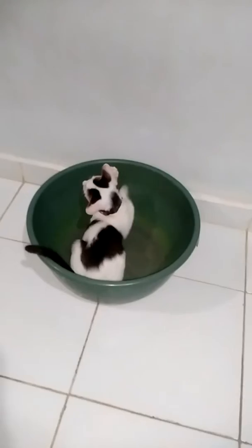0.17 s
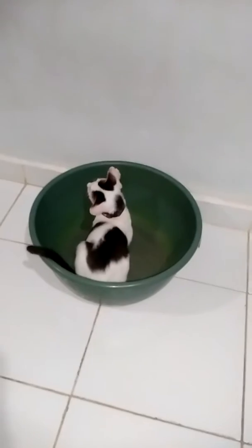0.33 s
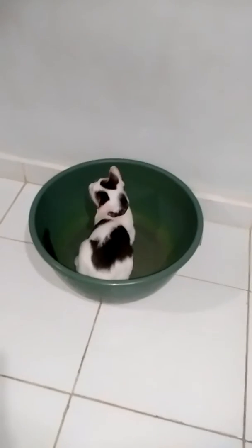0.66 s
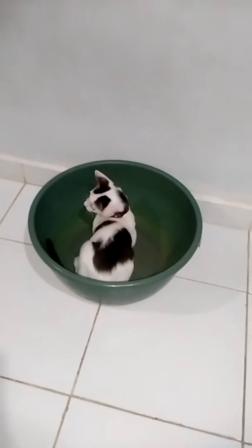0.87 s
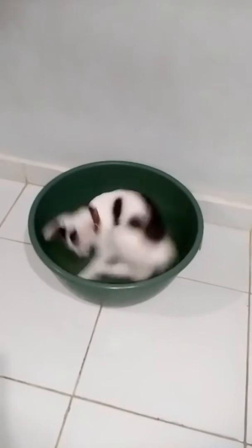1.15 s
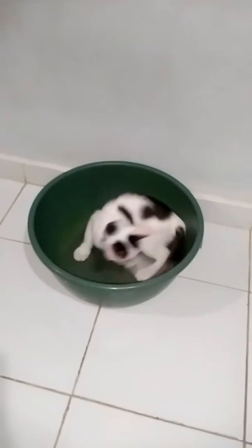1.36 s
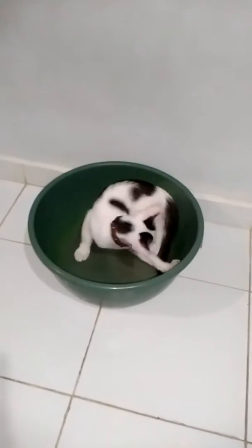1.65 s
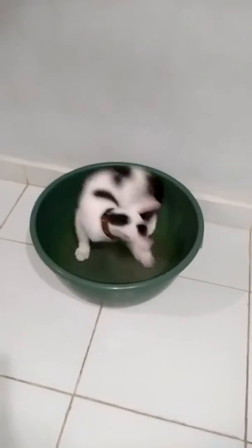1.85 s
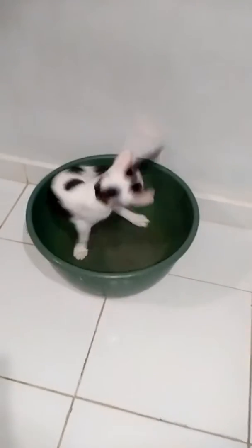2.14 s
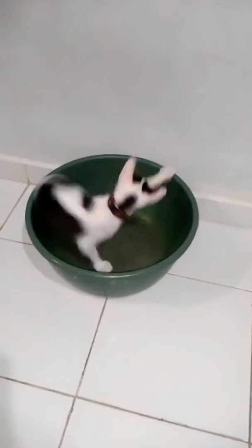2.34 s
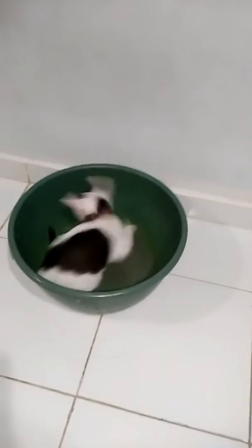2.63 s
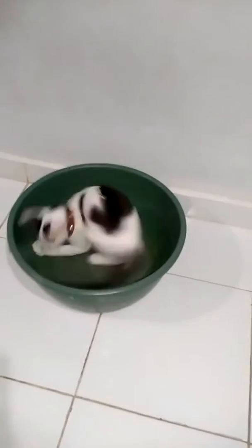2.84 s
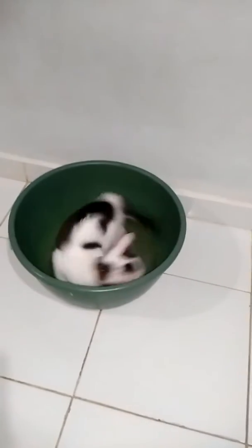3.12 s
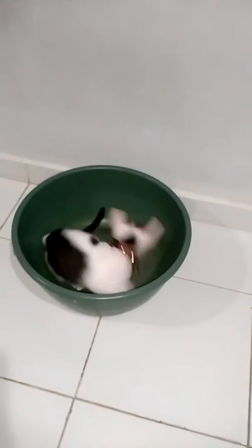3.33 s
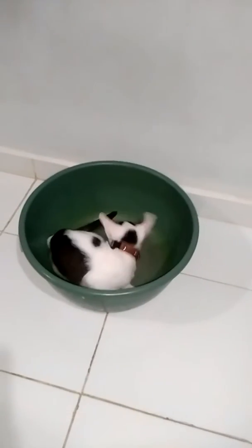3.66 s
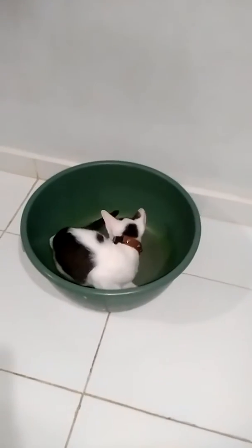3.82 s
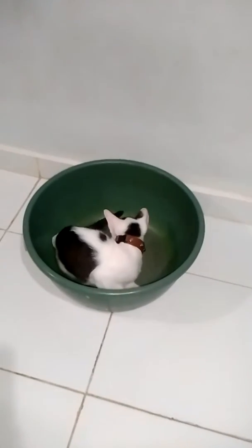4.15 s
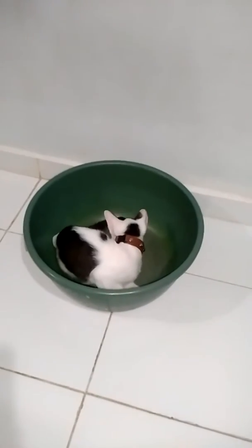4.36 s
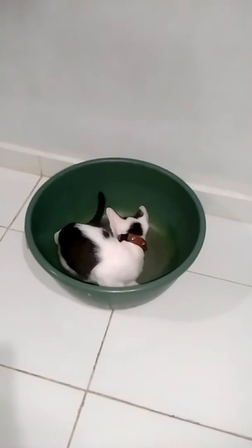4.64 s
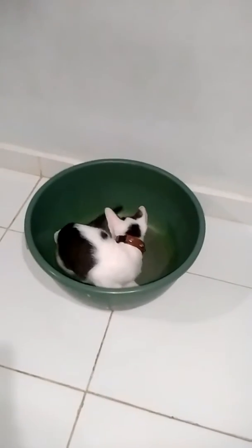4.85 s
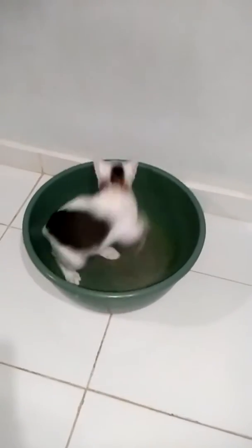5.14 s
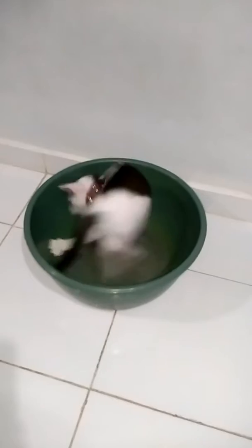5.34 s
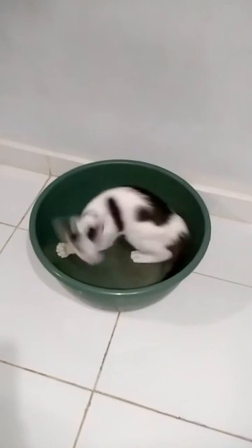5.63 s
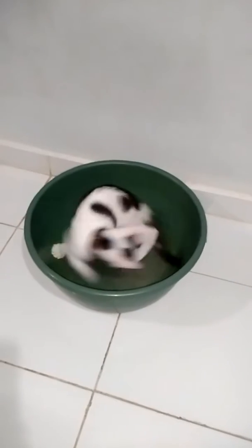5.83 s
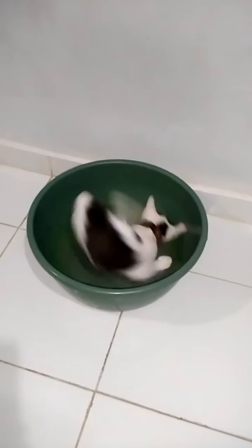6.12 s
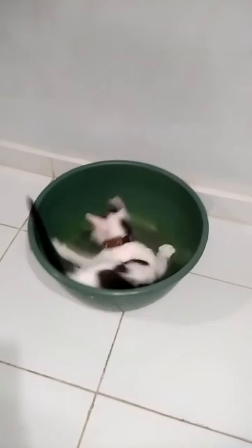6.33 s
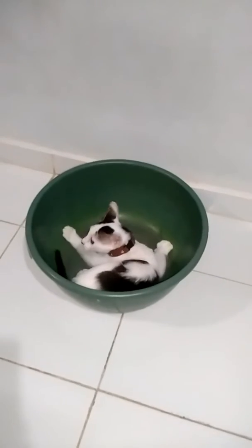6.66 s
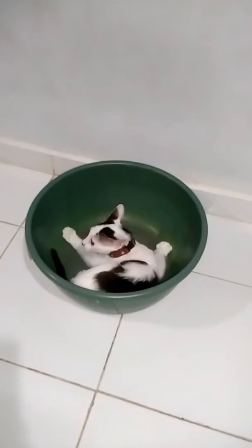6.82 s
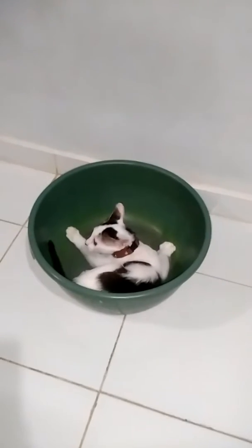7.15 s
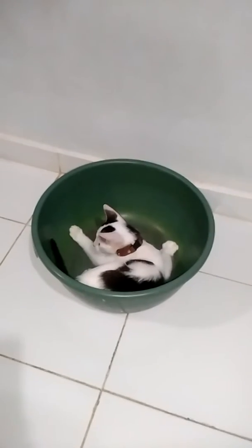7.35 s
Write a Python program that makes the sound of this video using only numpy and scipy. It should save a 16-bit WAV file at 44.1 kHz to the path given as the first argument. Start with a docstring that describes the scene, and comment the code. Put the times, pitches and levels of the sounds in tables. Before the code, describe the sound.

Close, slightly thin sound in a hard, lively little room. Soft fur and pads rub plastic, then claws scrape in jerky swipes with falling squeaky edges, while paws knock the hollow shell. A tiny bell tinkles now and then. Beneath it a steady low electric hum switches on and later cuts off. Play pauses midway, bursts out again, then settles into quiet house air.

```python
"""A kitten plays in a plastic basin on a tiled floor: fur and pads first rub it in filtered stick-slip noise.
Claws soon scrape it in jerky strokes; from about 1.1 to 4.7 s a motor hums in harmonics and whirrs in shaped noise.
From 1.3 s landings thump the shell as noise and decaying modes, and claw tips tick in short noise bursts.
A collar bell jingles from 1.6 s as a pellet excites its modes; the motor's works coast on faintly to the end.
The hard little room answers the kitten's sounds with decaying noise, over quiet house air."""
import sys
import numpy as np
from scipy import signal
from scipy.fft import rfft, irfft, next_fast_len
from scipy.io import wavfile
from scipy.ndimage import map_coordinates

SR = 44100
rng = np.random.default_rng(int(sys.argv[2]) if len(sys.argv) > 2 else 0)


def master(y):
    """Save y as 16-bit WAV."""
    cut = np.clip(np.atleast_2d(y).T, -1, 1)
    pcm = np.round(cut * 32767)  # scale
    wavfile.write(sys.argv[1], SR, pcm.astype(np.int16))


N = 330029

# Quiet air of the house. Each row: frequency in Hz, relative level in dB per Hz.
AIR_SPECTRUM = [(15, -56), (25, 1), (102, 4.5), (123, -5.5), (141, -3.5), (330, -10), (442, -11.5),
                (772, -17.5), (1580, -21), (1810, -20.5), (3520, -26.5), (6480, -29.5), (14400, -33)]
# Reverberation of the tiled room. Each row: frequency in Hz, time to fall 60 dB in seconds.
ROOM_DECAY = [(150, 0.38), (400, 0.33), (1000, 0.41), (3000, 0.47), (6000, 0.33), (12000, 0.44)]
# Spread of the room's answer. Each row: frequency in Hz, gain of the side signal in dB.
SIDE_GAIN = [(3200, -79), (4200, -49), (6000, -6), (12000, -4.0)]

# Harmonics of the motor's hum, from the first upwards. Each entry: level in dB relative to HUM_DB.
HUM_HARMONICS = [1.5, -62, -31, -29, -31.5, -37.5]
# Brief dips of the hum. Each row: centre in seconds, depth in dB, half width at 1/e of the depth in seconds.
HUM_DIPS_DB = [(1.35, 22, 0.034), (3.9, 4, 0.12)]
# Noise of the motor's works. Each row: frequency in Hz, relative level in dB per Hz.
WHIRR_SPECTRUM = [(76, -39), (130, 7), (168, -5.5), (212, -4), (376, 5.5), (421, -2), (515, 0),
                  (758, -10.5), (1070, -4), (1720, -43), (2220, -56), (2920, -35), (4000, -24.5),
                  (5200, -58), (8800, -120)]
# Resonances of the motor's casing. Each row: frequency in Hz, width in Hz, lift in dB.
CASING_RESONANCES = [(162.4, 9.2, 16), (329.4, 4.3, 3), (378, 7.5, 2.5), (1031, 53, 5)]
# Shaking of the motor's frame. Each row: frequency in Hz, relative level in dB per Hz.
MOUNT_SPECTRUM = [(30, -23), (62, 3), (80, 10.5), (100, 0.0), (130, -18), (200, -45.5)]

# Shakes of the collar bell. Each row: start in seconds, level in dB before ring and click gains, length in seconds.
BELL_SHAKES = [(1.59, -45, 0.032), (2.048, -45.5, 0.016), (2.22, -48.5, 0.026), (2.394, -37, 0.028),
               (2.423, -50, 0.032), (3.525, -47, 0.0027), (5.288, -56, 0.04), (6.26, -52, 0.0042),
               (6.437, -37.5, 0.012), (6.487, -34, 0.087), (6.706, -46, 0.0018), (6.7578, -36.5, 0.0087)]
# Modes of the bell. Each row: frequency in Hz, relative level in dB, time to fall 60 dB in seconds.
BELL_MODES = [(3615, -7, .12), (3655, 0, .19), (3690, -4, .14), (3806, -9, .12), (4032, -14, .07),
              (4200, -13, .07), (4480, -13, .08), (4635, -12, .1), (8651, -14, .24), (9365, -19, .2),
              (9400, -18, .24)]
# Click of the pellet on the bell. Each row: frequency in Hz, relative level in dB per Hz.
PELLET_SPECTRUM = [(1500, -34), (3000, -50), (3600, 19), (4600, 9.5), (5600, 8.5), (7000, -7.5), (9300, -5),
                   (12000, -60)]

# Soft pads on plastic. Each row: start in seconds, rms level in dB before the pressure curve, pitch in Hz,
# length in seconds.
PAD_RUBS = [(0.0, -61.5, 470, 0.087), (0.983, -61.5, 666, 0.28), (1.797, -61, 2850, 0.12),
            (3.676, -53.5, 1490, 0.12), (4.013, -63.5, 3050, 0.13), (4.222, -68.5, 2730, 0.22),
            (4.487, -61.5, 3030, 0.11), (4.757, -57, 1830, .12), (4.904, -56, 1560, 0.11)]
# Fur sliding as the kitten turns. Each row: time in seconds, level in dB common to all the sliding layers.
SLIDE_LEVEL = [(0.0, -65), (0.73, -85), (1.1, -63.5), (1.29, -58), (1.48, -54.5), (1.87, -58), (2.08, -52),
               (3.5, -53.5), (3.85, -67), (4.4, -59), (4.92, -58), (5.39, -50.5), (5.62, -63),
               (5.85, -78.5), (6.31, -44.5), (6.6, -58), (6.9, -108), (7.48, -107)]
# Fur brushing plastic. Each row: frequency in Hz, relative level in dB per Hz.
FUR_SPECTRUM = [(300, -5), (1000, -2), (2000, -12), (3000, -12.5), (4300, -6.5), (5700, -3.5), (7000, -9),
                (9000, -16.5), (14400, -40)]

# Landings on the shell. Each row: time in seconds, boom peak in dB, knock peak in dB, boom pitch in Hz.
LANDINGS = [(1.337, -32, -30, 169), (2.1738, -26.5, -29.5, 186), (2.3285, -25.5, -27, 572.6),
            (2.3407, -28, -41, 173), (2.4196, -35, -23.5, 162), (2.6004, -24.5, -47, 167),
            (2.8809, -33.5, -36, 170), (3.0444, -35.5, -29, 189), (3.161, -33, -34, 157),
            (3.3501, -40, -21, 161), (5.3402, -43, -39, 170), (5.3823, -41, -37.5, 162),
            (5.461, -27.5, -34, 410), (5.5193, -29, -34, 387), (5.9009, -32, -30, 163),
            (6.04, -39, -41, 174), (6.1748, -37, -33.5, 343), (6.347, -20.5, -22, 232)]
# Modes of the basin. Each row: frequency in Hz, relative level in dB, time to fall 60 dB in seconds.
BASIN_MODES = [(174, 2.5, 0.1), (199, -1, 0.066), (252, -2.5, 0.058), (303, -1, 0.14), (420, -12, 0.17),
               (545, -2.5, 0.061), (824, -3, 0.035), (1060, -18, 0.033), (1420, -11, 0.059),
               (1645, 1, 0.056)]
# Blow on the shell. Each row: frequency in Hz, relative level in dB per Hz.
SHELL_SPECTRUM = [(30, -58), (75, -4.5), (120, -16.5), (185, -0.5), (400, 4), (700, -6), (1050, -1.5),
                  (1700, -8), (3000, -12), (8000, -45)]

# Claws dragged along the wall. Each row: time in seconds, level in dB before layer gains,
# rasp of the wall relative to it in dB before layer gains, claw pitch in Hz.
CLAW_STROKES = [(0.493, -49.5, -10, 6450), (1.154, -42, -0.5, 4900), (1.346, -35, 1.5, 4020),
                (1.506, -35, -7, 5450), (1.883, -29, -14.5, 4810), (1.95, -31, -17, 4840),
                (2.211, -27.5, -15, 3700), (2.332, -32, -9, 4300), (2.593, -25, -4.5, 4700),
                (2.792, -31.5, -16, 4580), (3.279, -31, -11, 4180), (3.358, -40, 2.5, 4600),
                (4.905, -43.5, -3.5, 4600), (5.28, -51, -16, 4130), (5.41, -29, -13, 6240),
                (5.448, -29, -2, 3370), (5.82, -31.5, -18, 6250), (5.843, -33, -9, 4200),
                (6.117, -34, -30, 3200), (6.227, -36.5, -24, 6100), (6.666, -32, -20.5, 5440)]
# Claw tips striking the wall. Each row: time in seconds, tip peak in dB before dulling,
# clack of the wall relative to the tip in dB before a 4 dB lift.
CLAW_TICKS = [(1.3386, -25.5, -33), (1.3646, -24.5, -25), (2.0477, -25.5, -46), (2.4192, -27, -13),
              (2.597, -24, -10), (2.9528, -36.5, -3.5), (3.011, -26, -13), (3.1088, -21.5, -16),
              (3.3496, -25.5, -10), (3.5247, -28, -37), (5.225, -23, -13), (5.5192, -27, -8.5),
              (6.033, -38.5, -27), (6.104, -21, -2), (6.1753, -27, -4)]
# Sound of the claw. Each row: frequency in Hz, relative level in dB per Hz.
CLAW_SPECTRUM = [(1470, -28.5), (2500, -11.5), (5010, -2.5), (6720, -7), (7390, -15), (8130, -17.5),
                 (10700, -27), (14400, -27)]
# Sound of the stiff wall. Each row: frequency in Hz, relative level in dB per Hz.
WALL_SPECTRUM = [(300, -18), (800, -4.5), (1100, 5), (1500, 2), (2000, 1.5), (3000, -1.5), (4500, -8),
                 (9000, -79)]
# Soft plastic dulling the ticks. Each row: frequency in Hz, gain in dB.
TICK_DULLING = [(9500, 0.5), (12000, -11)]

MOTOR_ON_S, MOTOR_OFF_S = 1.085, 4.671
HUM_DB, WHIRR_DB, SHUDDER_DB, ROTOR_DB = -31, -46.5, -48.5, -44.5  # gains of the motor's layers
HUM_RISE_S, STOP_DB_PER_S = 0.13, 161  # time constant of the hum's rise; fall once the power is off
SURGE_DB, SURGE_S = 6, 0.035  # the works are louder as they start
COAST_DB, COAST_DB_PER_S = -12, 10  # level and fall of the works as they coast
ROTOR_HZ, SPIN_UP_S, SLOW_HZ_PER_S = 90.7, 0.081, 31

RATTLE_S = .026  # the pellet's flight across the bell
CLICK_DB, BOUNCE_LOSS_DB = 4, 4.5  # gain of the pellet's click; loss at each bounce
RUB_Q = 5.7  # sharpness of the resonance a pad wakes
BOOM_REACH = 2.07  # top of the boom, as a multiple of its pitch
KNOCK_HZ = 1010  # centre of the knock's hump, the same for every landing

STROKE_S = 0.067  # one swipe of a paw
SQUEAK_DB, SQUEAK_Q, SQUEAK_FALL_OCTAVES = -5.5, 26, 0.52
# The tip's hump rises with strike level so steeply that it is audible only near TIP_AT_DB.
TIP_HZ, TIP_AT_DB, TIP_OCTAVES_PER_DB = 5130, -28.5, 1.97
TOP_HZ = 14400  # band limit of the microphone


def amp(db):
    """Decibels express a ratio of amplitudes on a logarithmic scale."""
    return 10 ** (np.asarray(db) / 20)


def unit(x):
    """Division by the root mean square sets the rms to 1."""
    return x / np.sqrt(np.mean(x ** 2) + 1e-20)


def crest(x):
    """Division by the largest magnitude sets the peak to 1."""
    return x / np.abs(x).max()


def along(points, hz):
    """Interpolation on a logarithmic frequency axis follows the spacing of musical intervals."""
    f, v = np.transpose(points)
    return np.interp(np.log(hz + 1), np.log(f + 1), v)


def wobble(rate):
    """A spline through random knots, rate of them a second, gives a smooth fluctuation."""
    knots = rng.standard_normal(int(N * rate / SR) + 4)
    return map_coordinates(knots, [np.arange(N) * rate / SR])


def filtered(x, response):
    """A linear system multiplies the spectrum by its frequency response."""
    m = next_fast_len(N + SR // 2)
    return irfft(rfft(x, m) * response(np.fft.rfftfreq(m, 1 / SR)), m)[..., :N]


def shaped_noise(spectrum_db):
    """White noise takes the colour of the response it passes through, here at rms 1."""
    return unit(filtered(rng.standard_normal(N), lambda hz: amp(spectrum_db(hz))))


def coloured(x, spectrum, size=2048):
    """Folding the cepstrum gives the causal, minimum-phase filter that has this spectrum."""
    gain = amp(along(spectrum, np.fft.rfftfreq(size, 1 / SR)))
    cepstrum = irfft(np.log(gain + 1e-6))
    cepstrum[1:size // 2] *= 2
    cepstrum[size // 2 + 1:] = 0
    impulse = irfft(np.exp(rfft(cepstrum)))
    return signal.fftconvolve(x, impulse)[:len(x)]


def bright(spectrum, hz, lift_db, octaves):
    """A contact point resonates in its own range: a hump at hz is added to the spectrum."""
    grid = np.geomspace(30, SR / 2, num=160)
    hump = np.exp(-np.log2(grid / hz) ** 2 / octaves ** 2)
    return np.column_stack([grid, along(spectrum, grid) + lift_db * hump])


def narrow(x, hz, q):
    """A resonance of sharpness q passes a band of width hz / q, here at rms 1."""
    edges = np.clip([hz * (1 - .5 / q), hz * (1 + .5 / q)], 20, SR / 2.1)
    return unit(signal.lfilter(*signal.butter(2, edges, "bandpass", fs=SR), x))


def add(track, s, sound):
    """Superposition: a sound is summed into the track at time s."""
    part = track[max(round(s * SR), 0):][:len(sound)]
    part += sound[:len(part)]


def ring(modes, t, scatter_db):
    """A struck body is a sum of decaying modes, each at a new random strength for every blow."""
    total = 0
    for hz, db, t60 in modes:
        decay = amp(db + scatter_db * rng.normal() - 60 * t / t60)
        total = total + decay * np.sin(2 * np.pi * hz * t)
    return total


def slips(size, rate, hiss):
    """Stick-slip friction releases in random jerks, rate of them a second, over a fine hiss."""
    jerks = (rng.random(size) < rate / SR) * rng.standard_normal(size)
    return unit(unit(jerks) + hiss * rng.standard_normal(size))


def burst(t, t60, after_db, after_t60):
    """An impact is a sharp contact with a longer chatter beneath it, both decaying exponentially."""
    contact = amp(-60 * t / t60)
    chatter = amp(after_db - 60 * t / after_t60)
    return rng.standard_normal(len(t)) * (contact + chatter)


def pressure(t, length):
    """Contact force rises as a paw presses down, then relaxes more slowly."""
    return np.abs(np.sin(np.pi * np.clip(t / length, 0, 1) ** 0.6))


def air():
    """Ambient noise is broadband and steady, with a slow drift in level."""
    drift_db = wobble(1.67)
    return amp(-64.5 + drift_db) * shaped_noise(lambda hz: along(AIR_SPECTRUM, hz))


def room_tail():
    """Diffuse reverberation is noise that decays exponentially, at its own speed in each band."""
    hz, t, z = signal.stft(rng.standard_normal(3 * SR // 4), SR, nperseg=256)
    decay = amp(-60 * t / along(ROOM_DECAY, hz)[:, None])
    tail = signal.istft(z * decay, SR, nperseg=256)[1]
    tail = tail * (1 - np.exp(-np.arange(len(tail)) / SR / 0.01))  # gradual onset
    return tail / np.linalg.norm(tail)


def room(x, size=13000):
    """Reverberation is convolution with a tail, drawn anew for each block of the sound."""
    out = np.zeros(N)
    for start in range(0, N, size):
        add(out, start / SR, signal.fftconvolve(x[start:start + size], room_tail()))
    return out


def motor():
    """Two close tones beat, mains hum and slower rotor, while the casing's resonances colour the works' noise."""
    t = np.arange(N) / SR
    since_on, since_off = np.maximum(t - MOTOR_ON_S, 0), np.maximum(t - MOTOR_OFF_S, 0)
    power = (1 - np.exp(-since_on / 0.0056)) * amp(-STOP_DB_PER_S * since_off)
    dip_db = sum(depth * np.exp(-((t - s) / width) ** 2) for s, depth, width in HUM_DIPS_DB)
    swing = power * (1 - np.exp(-(since_on / HUM_RISE_S) ** 2)) * amp(-dip_db)

    phase = 2 * np.pi * 100.3 * t + .08 * wobble(12)
    hum = sum(amp(db) * np.sin(k * phase) for k, db in enumerate(HUM_HARMONICS, 1))
    rotor_hz = ROTOR_HZ * (1 - np.exp(-since_on / SPIN_UP_S)) - SLOW_HZ_PER_S * since_off
    turns = np.cumsum(np.maximum(rotor_hz, 0)) / SR
    rotor = np.sin(2 * np.pi * turns + 0.55 * wobble(3.6))
    tones = amp(HUM_DB) * hum + amp(ROTOR_DB) * rotor

    def casing_db(hz):
        """Each resonance lifts the spectrum by a bell-shaped, Lorentzian curve in dB."""
        return sum(db / (1 + (2 * (hz - centre) / width) ** 2) for centre, width, db in CASING_RESONANCES)

    shudder = shaped_noise(lambda hz: along(MOUNT_SPECTRUM, hz))
    whirr = shaped_noise(lambda hz: along(WHIRR_SPECTRUM, hz) + casing_db(hz))
    # the whirr pulses with the hum and surges as the load shifts
    whirr = whirr * (1 + 0.11 * np.sin(phase)) * amp(wobble(8))
    noise = amp(WHIRR_DB) * whirr + amp(SHUDDER_DB) * shudder

    running = power * amp(SURGE_DB * np.exp(-since_on / SURGE_S))
    coast = (since_off > 0) * amp(COAST_DB - COAST_DB_PER_S * since_off)
    works = np.maximum(running, coast * np.clip(rotor_hz / ROTOR_HZ, 0, 1))
    return swing * tones + works * noise


def clink(count=3):
    """Repeated impacts excite modes: the pellet clicks and bounces, loading the bell differently each time."""
    out, t = np.zeros(SR // 2), np.arange(SR // 3) / SR
    gaps = rng.uniform(.005, .013, count)  # seconds
    swell = 1 - np.exp(-t / 0.0008)
    for k, delay in enumerate(np.cumsum(gaps) - gaps[0]):
        detuned_t = t * (1 + 0.0041 * rng.normal())
        tone = swell * ring(BELL_MODES, detuned_t, scatter_db=1.5)
        chatter = burst(t, t60=0.011, after_db=10, after_t60=0.13)
        click = crest(coloured(swell * chatter, PELLET_SPECTRUM))
        add(out, delay, amp(-BOUNCE_LOSS_DB * k) * (amp(-1.0) * tone + amp(CLICK_DB) * click))
    return out


def bell():
    """A loose striker makes periodic impacts: while a shake lasts the pellet flies to and fro."""
    out = np.zeros(N)
    for s, db, length in BELL_SHAKES:
        for delay in np.arange(0, length + RATTLE_S / 2, RATTLE_S):
            add(out, s + delay, amp(db) * clink())
    return out


def rubs():
    """Friction drives a resonator: a softly dragged pad wakes one narrow resonance."""
    out, t = np.zeros(N), np.arange(SR // 4) / SR
    for s, db, hz, length in PAD_RUBS:
        friction = slips(len(t), rate=900, hiss=0.8)
        add(out, s, amp(db) * pressure(t, length) * narrow(friction, hz, RUB_Q))
    return out


def sliding():
    """Friction noise is coloured by both surfaces: uneven touches wake two narrow resonances of the wall."""
    s, db = np.transpose(SLIDE_LEVEL)
    slide_db = np.interp(np.arange(N) / SR, s, db)

    def brush(spectrum, db):
        """Distributed contact radiates a broad spectrum."""
        return unit(coloured(slips(N, rate=450, hiss=1.0), spectrum)) * amp(db + 4.5 * wobble(22))

    def touch(hz, db):
        """Local contact excites one sharp resonance."""
        return narrow(slips(N, rate=880, hiss=0.6), hz, q=16) * amp(db + 1.6 * wobble(9))

    brushes = brush(FUR_SPECTRUM, db=-3.0) + brush(WALL_SPECTRUM, db=-15.5)
    return amp(slide_db) * (brushes + touch(hz=2830, db=-18) + touch(hz=5970, db=-13.5))


def thumps():
    """An impact excites a shell's modes: the boom's pitch depends on where the weight sits; the knock is damped more."""
    out, t = np.zeros(N), np.arange(SR // 4) / SR
    soft = 1 - np.exp(-t / 0.00069)  # the pad gives way first
    for s, boom_db, knock_db, boom_hz in LANDINGS:
        knocked = bright(SHELL_SPECTRUM, KNOCK_HZ, lift_db=5.0, octaves=0.16)
        skin = bright(knocked, boom_hz, lift_db=3.5, octaves=0.33)
        contact = crest(coloured(burst(t, t60=0.044, after_db=-20.0, after_t60=0.25), skin))
        blow = contact + .5 * crest(ring(BASIN_MODES, t, scatter_db=4.5))
        flex = ring([(boom_hz, -12, .08)], t, scatter_db=0.0)  # the loaded patch of the shell
        boom = signal.lfilter(*signal.butter(2, BOOM_REACH * boom_hz, fs=SR), blow) + flex
        knock = signal.lfilter(*signal.butter(2, 700, "high", fs=SR), blow) * amp(-60 * t / 0.27)
        add(out, s - .001, amp(boom_db) * crest(soft * boom) - amp(knock_db) * crest(soft * knock))
    return out


def scrapes(count=5):
    """Stick-slip in clumps shakes the wall, and the claw's own resonance sinks as the stroke slows."""
    out, t = np.zeros(N), np.arange(SR // 4) / SR
    grip = amp(2.7 * wobble(130))
    progress = np.clip(t / STROKE_S, 0, 1)
    for s, db, rasp_db, hz in CLAW_STROKES:
        force = unit(slips(len(t), rate=710, hiss=1.0) * grip[round(s * SR):][:len(t)])
        claw = unit(coloured(force, bright(CLAW_SPECTRUM, hz, lift_db=11.0, octaves=1.0)))
        squeak = 0
        for u in np.linspace(0, 1, count):  # crossfade between fixed resonances
            fade = np.maximum(1 - (count - 1) * np.abs(progress - u), 0)
            squeak_hz = hz * 2 ** (SQUEAK_FALL_OCTAVES * (.5 - u))
            squeak = squeak + fade * narrow(force, squeak_hz, SQUEAK_Q)
        rasp = unit(coloured(force, WALL_SPECTRUM))
        stroke = amp(db - 12.5) * (claw + amp(SQUEAK_DB) * squeak) + amp(db + rasp_db - 7.5) * rasp
        add(out, s - .005, pressure(t, STROKE_S) * stroke)
    return out


def ticks():
    """A brief contact force has a broad spectrum: a claw tip cracks on the plastic and the stiff wall clacks."""
    out, t = np.zeros(N), np.arange(SR // 8) / SR
    bite = 1 - np.exp(-t / 0.00064)
    wall = bright(WALL_SPECTRUM, 2200, lift_db=6.5, octaves=0.11)
    for s, db, clack_db in CLAW_TICKS:
        hz = TIP_HZ * 2 ** (TIP_OCTAVES_PER_DB * (db - TIP_AT_DB))
        claw = bright(CLAW_SPECTRUM, hz, lift_db=15.0, octaves=0.55)
        tip = crest(coloured(bite * burst(t, t60=0.017, after_db=-14.0, after_t60=0.058), claw))
        clack = crest(coloured(bite * burst(t, t60=0.034, after_db=-14, after_t60=0.087), wall))
        add(out, s, amp(db) * (tip + amp(clack_db + 4) * clack))
    return out


def scene():
    """Mid and side superpose: sources lie straight ahead; reflections and a faint noise spread sideways."""
    tick = coloured(ticks(), TICK_DULLING)
    scrape = scrapes() + sliding() + rubs()
    thump, jingle = thumps(), bell()
    sent = amp(-2.0) * tick + amp(-4.5) * scrape + thump + amp(-6.5) * jingle  # what reaches the room
    mid = tick + scrape + thump + jingle + room(sent) + motor() + air()
    spread = room(sent) + amp(-73.5) * rng.standard_normal(N)
    side = filtered(spread, lambda hz: amp(along(SIDE_GAIN, hz)))
    return np.array([mid + side, mid - side])


def record(dry):
    """A small microphone is a band-pass: it loses the deepest bass and keeps nothing above its band limit."""
    thin = signal.lfilter(*signal.butter(3, 48, "high", fs=SR), dry)
    return filtered(thin, lambda hz: hz < TOP_HZ)


dry = scene()
out = record(dry)
master(out)
```